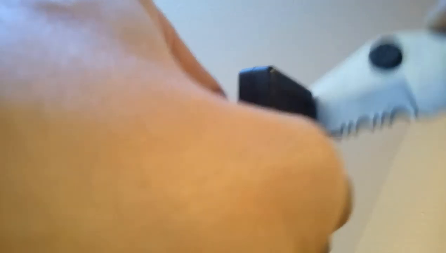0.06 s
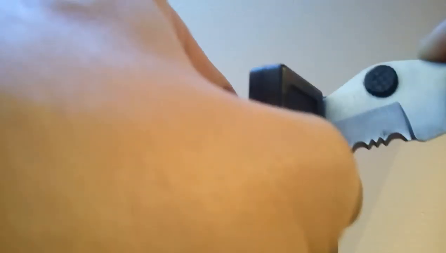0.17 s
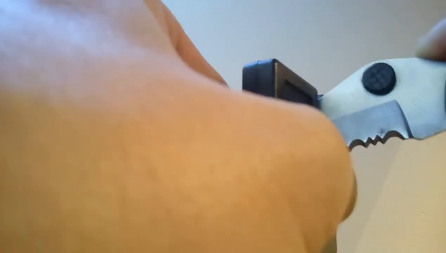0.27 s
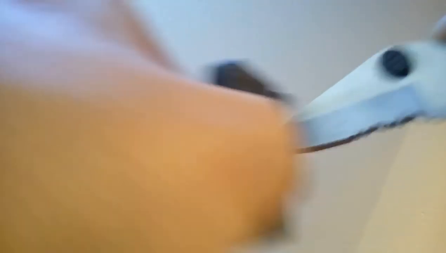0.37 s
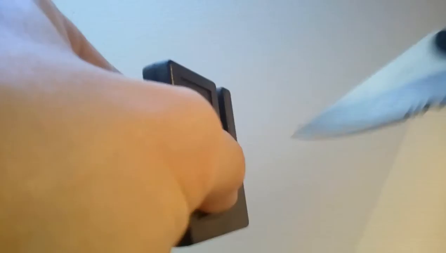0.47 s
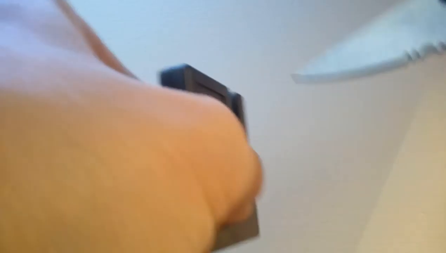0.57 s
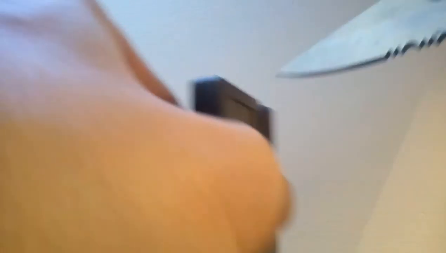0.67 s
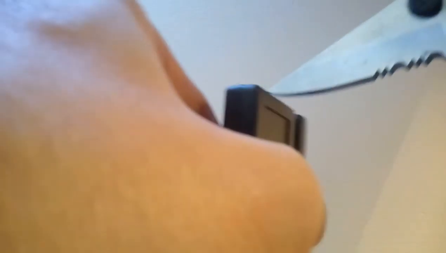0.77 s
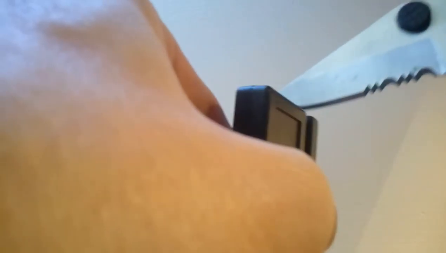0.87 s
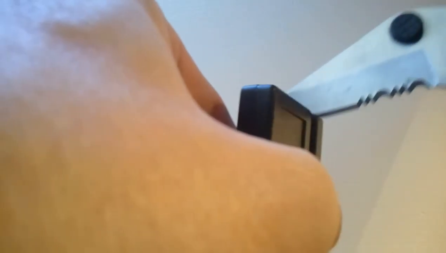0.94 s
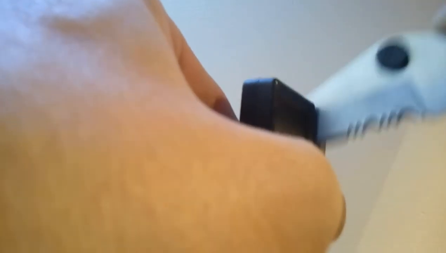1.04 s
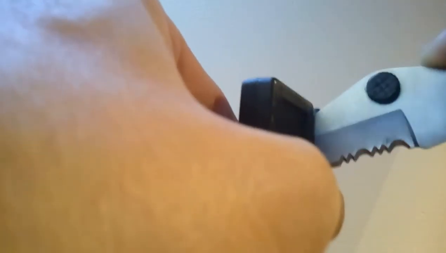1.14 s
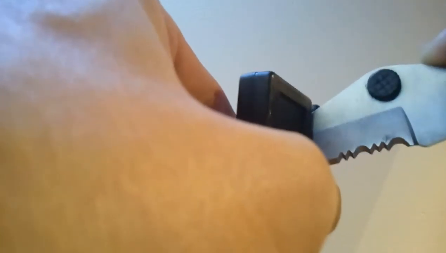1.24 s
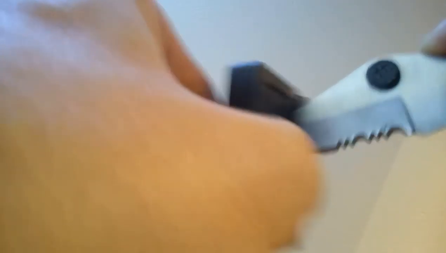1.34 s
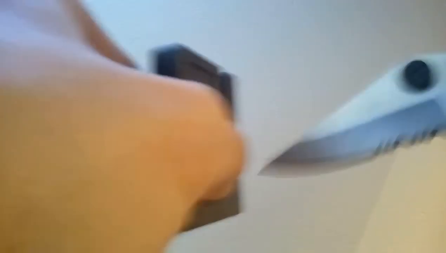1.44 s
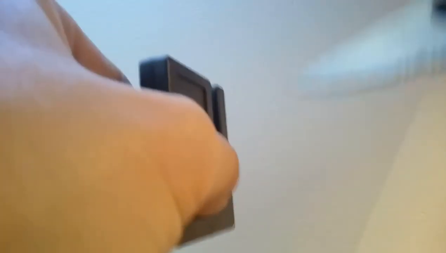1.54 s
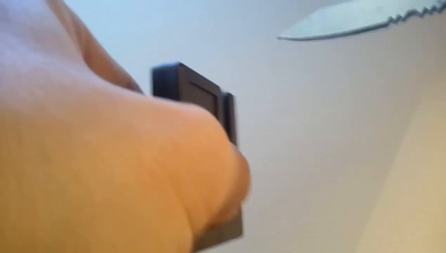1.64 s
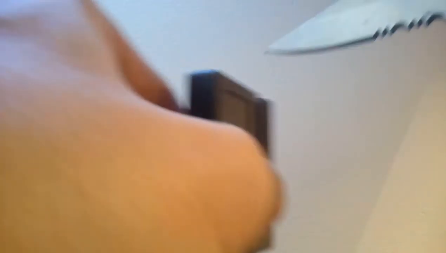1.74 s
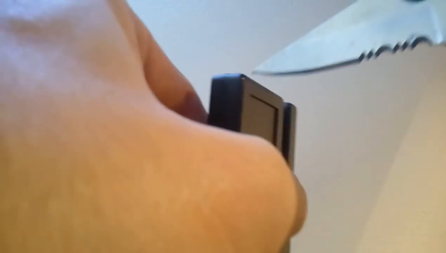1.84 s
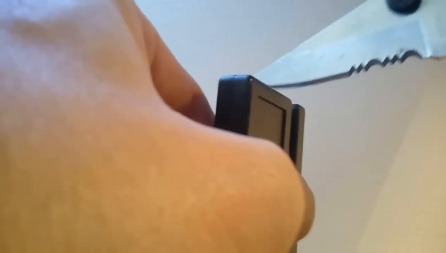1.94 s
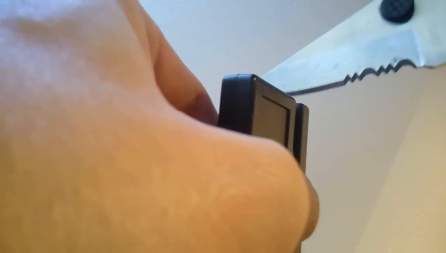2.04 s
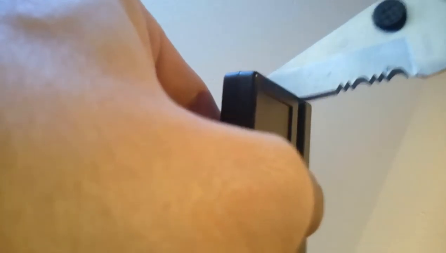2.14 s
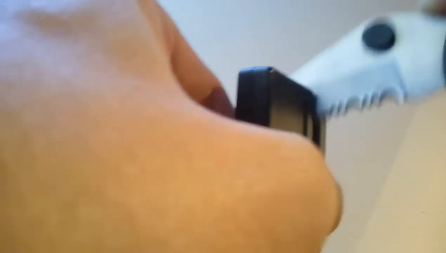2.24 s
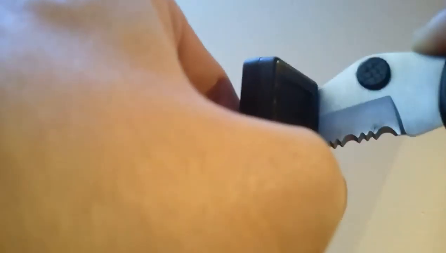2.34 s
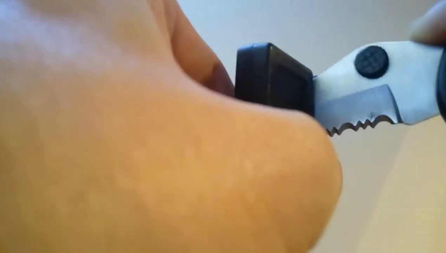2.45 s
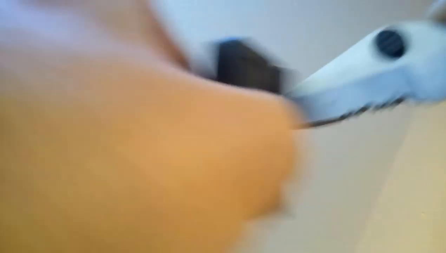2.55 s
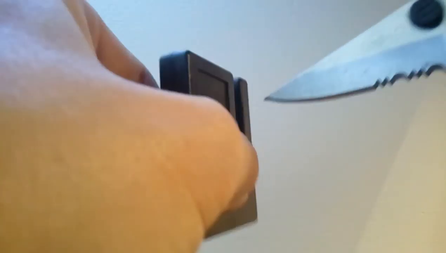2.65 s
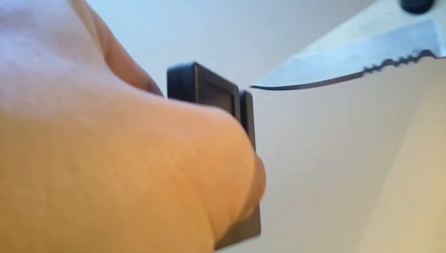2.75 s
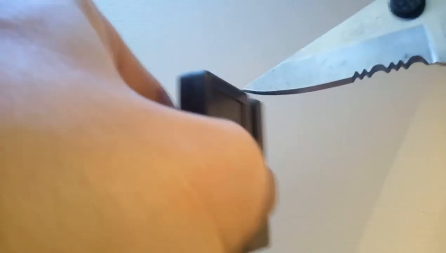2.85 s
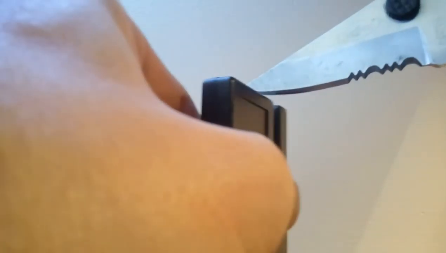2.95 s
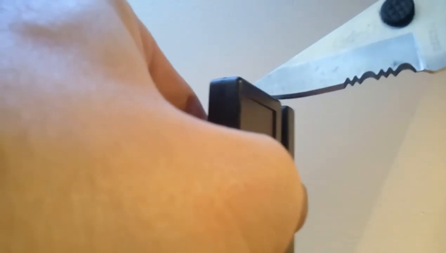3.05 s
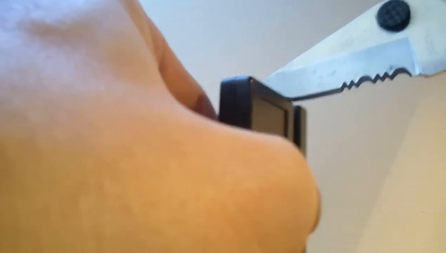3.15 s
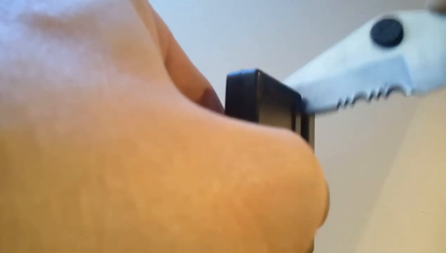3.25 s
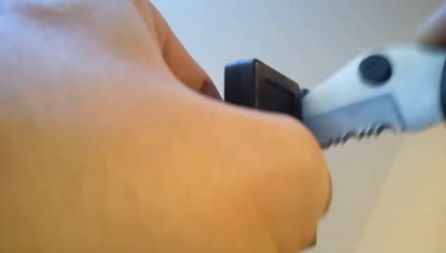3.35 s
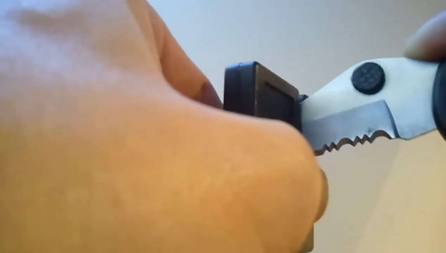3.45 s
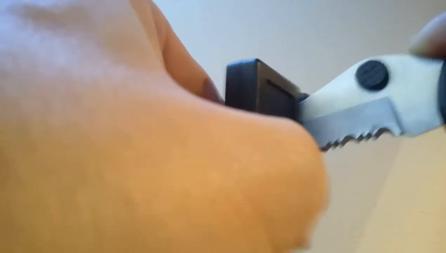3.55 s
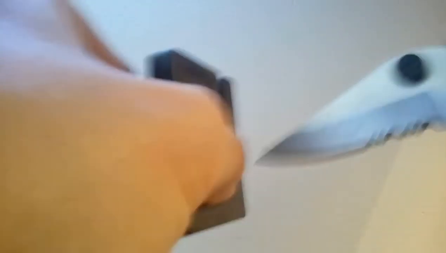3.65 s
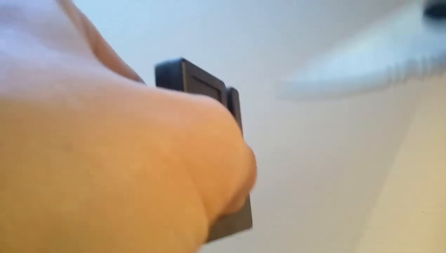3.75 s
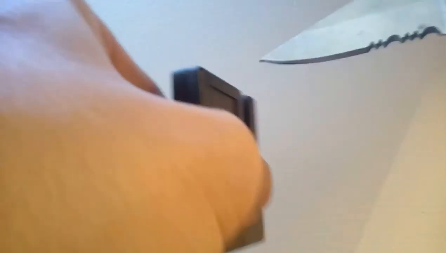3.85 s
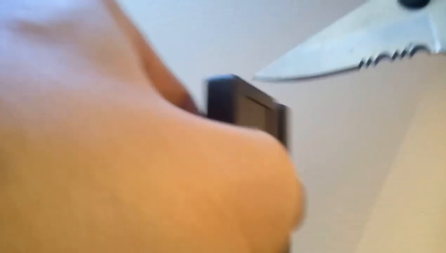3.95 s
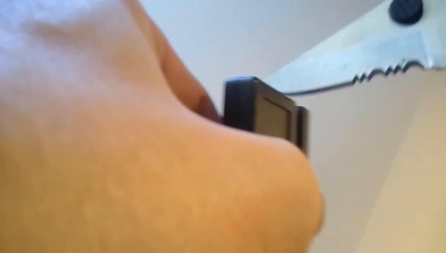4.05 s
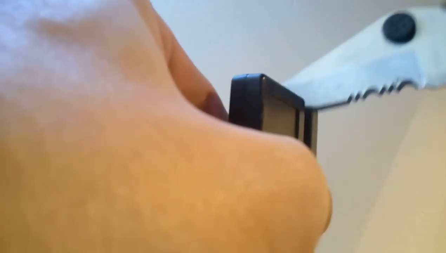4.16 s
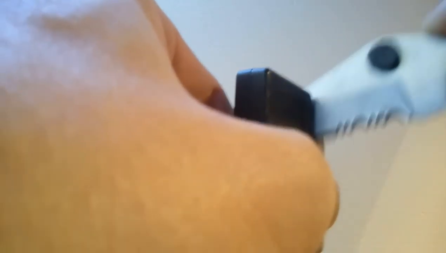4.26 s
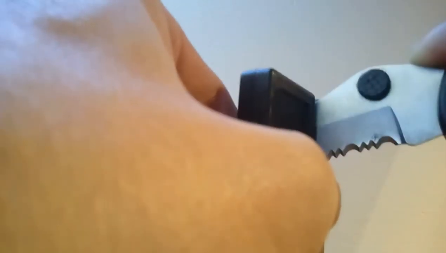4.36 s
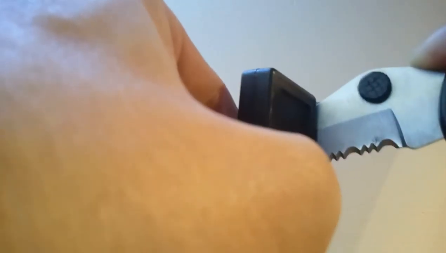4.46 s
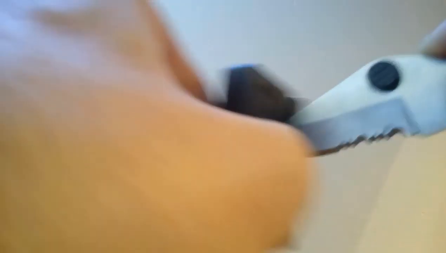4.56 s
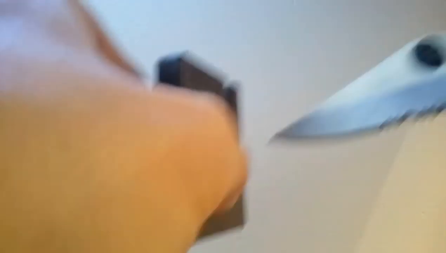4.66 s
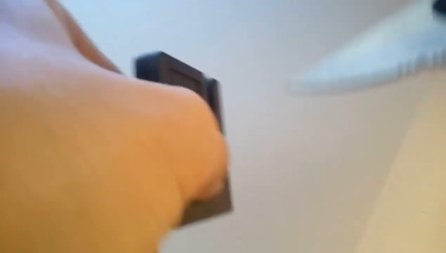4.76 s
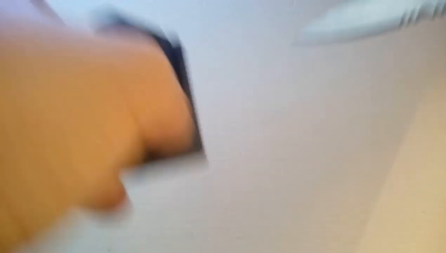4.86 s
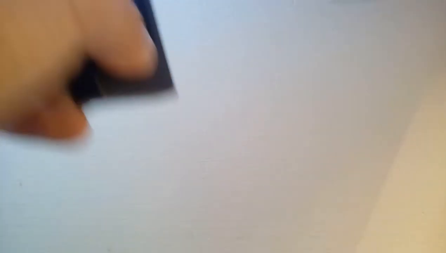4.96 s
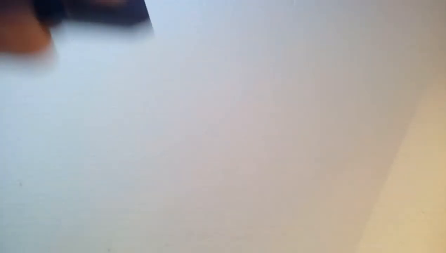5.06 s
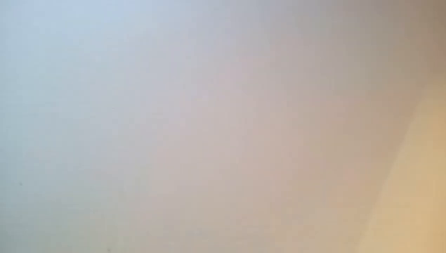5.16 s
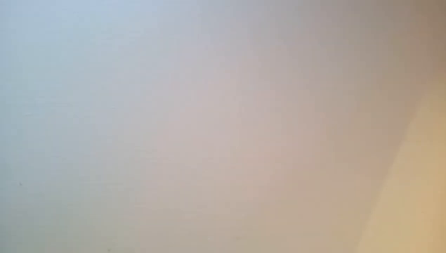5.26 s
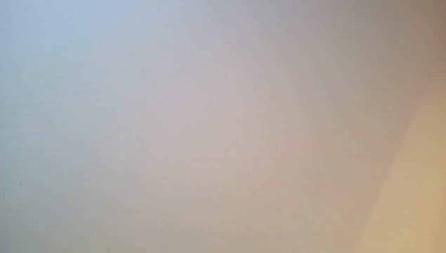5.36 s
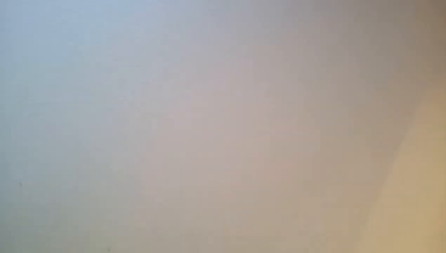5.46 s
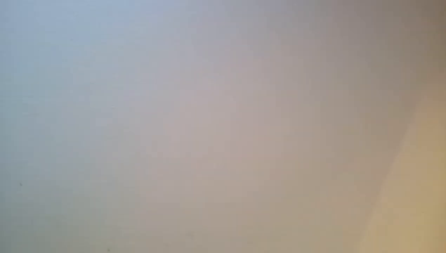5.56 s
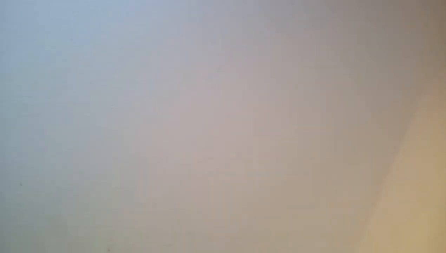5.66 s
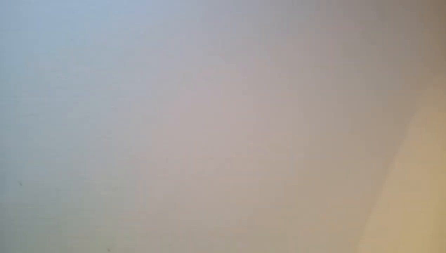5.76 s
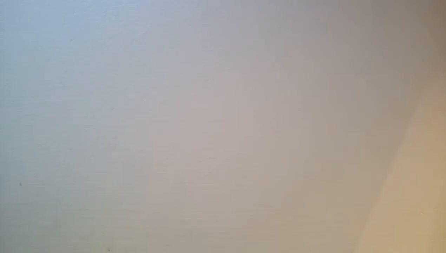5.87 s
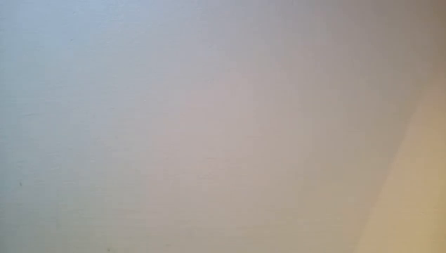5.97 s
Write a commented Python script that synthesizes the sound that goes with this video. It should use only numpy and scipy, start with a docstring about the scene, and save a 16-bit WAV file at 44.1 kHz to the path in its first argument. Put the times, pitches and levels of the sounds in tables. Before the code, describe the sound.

A knife blade clicks into a small plastic sharpener and rasps through in five short strokes, then light ticks and a knock as it is set down.

```python
"""A folding knife is drawn five times through a small plastic pull-through sharpener, close to a camera in a quiet room.
Each pull: the blade clicks into the slot, grit-driven noise hisses and rasps over the ceramic, a fuller click ends it,
faint at some, and the hand jolts (low damped modes). Skin rubs the camera case (slips through resonances), twice with
a faint high line. The blade skates in once; later the knife ticks, a sleeve rustles, and the sharpener is set down.
Room air and grip rumble lie beneath; room reflections and the microphone port colour the sound."""
import sys
import numpy as np
from scipy import signal
from scipy.fft import rfft, irfft, next_fast_len
from scipy.io import wavfile
from scipy.ndimage import map_coordinates

SR = 44100
rng = np.random.default_rng(int(sys.argv[2]) if len(sys.argv) > 2 else 0)


def put_to_file(sound):
    """Save the sound as 16-bit audio at rate SR, in the file named by the first command-line argument."""
    columns = np.atleast_2d(sound).T  # one column per channel
    safe = np.clip(columns, -1, 1)
    whole_steps = np.round(safe * 32767)
    wavfile.write(sys.argv[1], SR, whole_steps.astype(np.int16))


N = 265482  # length in samples

# Room air around the microphone. Each row: frequency in Hz, relative density in dB.
ROOM_AIR_SPECTRUM = [(15, -50.5), (25, -19), (114, -8.5), (242, -14.5), (427, -16.5), (734, -20),
                     (962, -18.5), (1230, -25.5), (5570, -33), (16000, -51.5)]
# Low rumble and thump of the gripping hand. Each row: frequency in Hz, relative density in dB.
GRIP_SPECTRUM = [(30, -27.5), (60, -12), (115, 5.5), (170, -5.5), (240, -9), (900, -56.5)]
# The grip tightens and its rumble swells. Each row: middle in seconds, level in dB.
GRIP_SWELLS = [(0.17, -50.5), (0.87, -51), (1.88, -50), (2.34, -50), (3.19, -56.5), (4.2, -49.5),
               (4.49, -46), (5.3, -58.5), (5.789, -50)]
GRIP_DB, GRIP_SWELL_S = -55, 0.046  # steady rumble; time from a swell's middle until it falls to 1/e

# The blade touches the lip of the slot, then seats in it. Each row: touch in seconds, seating in seconds,
# level in dB, lower housing ring in dB and steel ring in dB (both relative to the level; seating only).
SEATINGS = [(0.22, 0.2241, -4.5, -17, -7.5), (1.194, 1.204, -7, -3.5, -10.5), (2.419, 2.433, -4, -24, -11),
            (3.4833, 3.493, -4.5, -3.5, -15), (4.432, 4.436, -5.5, -16.5, -14.5)]
TOUCH_DB = -9.5  # the first touch, against the seating
# Plastic housing, lower mode first. Each row: frequency in Hz, relative level in dB, 60 dB decay in seconds.
HOUSING_MODES = [(2490, 0, 0.0096), (3380, -3, 0.0043)]
# Steel blade. Each row: frequency in Hz, relative level in dB, 60 dB decay in seconds.
STEEL_MODES = [(4000, -12.5, 0.004), (4505, 1, 0.0043), (4830, 4.5, 0.0053), (5470, -1.5, 0.004),
               (6340, -11, 0.005)]
# Noise of a hard steel contact. Each row: frequency in Hz, relative density in dB.
CRACK_SPECTRUM = [(60, -9.5), (300, -1.5), (1050, 10.5), (1650, 17.5), (2000, -2), (2500, 9), (6500, 13.5),
                  (8000, -9), (15000, -23)]
# Its topmost glint. Each row: frequency in Hz, relative density in dB.
SPARK_SPECTRUM = [(5000, -39.5), (7500, -3.5), (9800, 3.5), (11000, -6.5), (15000, -3)]
# Loose parts after a contact. Each row: frequency in Hz, relative density in dB.
RATTLE_SPECTRUM = [(300, -1), (2000, -6), (3500, -2), (6300, -4.5), (7800, -18.5), (15000, -33)]
CHATTER_DB = -5  # the chatter that goes with a contact, against its sharp push

# Room decay. Each row: frequency in Hz, 60 dB decay in seconds.
ROOM_DECAY = [(150, 0.25), (1000, 0.23), (4500, 0.11), (8000, 0.07), (15000, 0.065)]

# The blade is drawn through the slot. Each row: start in seconds, end in seconds,
# steel hiss in dB, housing rasp in dB, closing click in dB.
PULLS = [(0.415, 0.526, -32, -23.5, -1.5), (1.431, 1.531, -25.5, -26, 6.5),
         (2.612, 2.743, -31.5, -27.5, -16), (3.693, 3.777, -31.5, -22.5, -3),
         (4.64, 4.752, -23, -25.5, -14.5)]
# Grit against the steel edge. Each row: frequency in Hz, relative density in dB.
HISS_SPECTRUM = [(200, -37.5), (1100, -24.5), (2000, -30.5), (2950, -25.5), (3700, -1), (4800, 6.5),
                 (5500, 1.5), (6400, -16), (7500, -34.5), (9000, -48), (15000, -53.5)]
# Grit heard through the housing. Each row: frequency in Hz, relative density in dB.
RASP_SPECTRUM = [(100, -10.5), (350, -2), (700, -12.5), (1100, 0.5), (2100, -8), (2550, 0), (2900, -6.5),
                 (3400, 4.5), (4100, -7.5), (6500, -13), (7700, -23), (9000, -36), (15000, -42.5)]

# The hand recoils as the blade comes free. Each row: start in seconds, level in dB (lowered by JOLT_TRIM_DB).
JOLTS = [(0.527, -20.5), (1.535, -16.5), (2.783, -30.5), (3.777, -19.5), (4.828, -28.5)]
JOLT_TRIM_DB = -4.5

# Skin slides on the camera. Each row: start in seconds, length in seconds, rub level in dB, low drone level in dB.
RUBS = [(0.538, 0.1, -33.5, -40), (1.559, 0.085, -36, -47.5), (1.794, 0.029, -41, -52),
        (2.753, 0.13, -45.5, -54), (3.599, .02, -37.5, -55.5), (3.811, 0.1, -34, -46.5),
        (4.843, 0.04, -41.5, -46), (5.008, 0.064, -24.5, -32)]
RUB_SAG_DB_PER_S, DRONE_SAG_DB_PER_S, DRONE_HOLD_S = 71, 23.5, 0.016  # a touch eases off; the drone holds longer
# Camera case. Each row: frequency in Hz, width in Hz, relative level in dB.
CASE_MODES = [(683, 110, 0), (998, 41, 4.5), (1130, 86, -7), (1480, 85, -7), (1760, 140, -13)]
# Deep resonances of the case. Each row: frequency in Hz, width in Hz, relative level in dB.
CASE_LOW_MODES = [(222, 30, 2), (316, 19, -2.5), (418, 55, -10)]
# Skin friction. Each row: frequency in Hz, relative density in dB.
SKIN_SPECTRUM = [(150, -34.5), (400, -10), (1000, -4.5), (1600, -11), (2000, -17.5), (4200, -17),
                 (5500, -30), (6800, -16)]
# A faint fuzzy high line near 7 kHz, twice, during rubs. Each row: middle in seconds, level in dB,
# time to fall to 1/e in seconds.
HIGH_LINES = [(3.6, -44, 0.029), (5.053, -41, 0.055)]

# The loose tip bumps the sharpener. Each row: start in seconds, level in dB.
BUMPS = [(0.574, -20.5), (2.959, -15.5), (4.458, -19.5)]

# Light handling of the knife. Each row: start in seconds, level in dB, pitch in Hz.
TICKS = [(4.272, -34.5, 2420), (5.349, -47, 3300), (5.3608, -41.5, 4270), (5.396, -62, 3750),
         (5.414, -38.5, 3800), (5.427, -38.5, 4510), (5.703, -36.5, 3005), (5.837, -34, 1425),
         (5.8562, -35, 1710)]
# A light hard contact. Each row: frequency in Hz, relative density in dB.
TAP_SPECTRUM = [(600, -5.5), (1500, -12.5), (3000, 7), (6000, -9), (8500, -54), (15000, -50)]

# The edge skates into the slot. Each row: time in seconds, relative level in dB, pitch in Hz.
SKATE = [(4.315, -59, 2550), (4.345, -56, 2750), (4.362, -52, 3050), (4.415, -57, 2900)]

# The arm moves away. Each row: time in seconds, level in dB (lowered by SLEEVE_TRIM_DB).
RUSTLE = [(5.13, -61.5), (5.43, -57), (5.54, -66.5)]
SLEEVE_TRIM_DB = -1.5
# Moving cloth. Each row: frequency in Hz, relative density in dB.
SLEEVE_SPECTRUM = [(1500, -41), (3000, -4.5), (4000, 3.5), (5800, -5), (9000, -44)]

# The sharpener set down. Each row: frequency in Hz, mean level in dB, 60 dB decay in seconds.
KNOCK_MODES = [(323, -32, 0.33), (966, -15, 0.18), (1047, -26, 0.34), (1303, -19.5, 0.087),
               (1390, -17, 0.015), (3300, -32.5, 0.2), (4850, -20.5, 0.047)]

# Colour of the microphone port. Each row: frequency in Hz, gain in dB.
PORT_COLOUR = [(1550, -0.5), (2000, -1), (2450, -1.5), (2900, -1.5), (3350, 0), (4000, 1.5), (6500, -0.5),
               (8200, -6), (10000, -6)]
TOP_HZ = 15700  # band limit of the camera


def amp(db):
    """Decibels to gain."""
    return 10 ** (np.asarray(db) / 20)


def unit(x):
    """Scale to rms 1."""
    return x / np.sqrt(np.mean(x ** 2) + 1e-20)


def blow(x):
    """Scale a short sound to the energy of one millisecond at level 1."""
    return x / np.sqrt(np.sum(x ** 2) / (SR / 1000) + 1e-20)


def add(track, s, sound):
    """Mix a sound in at s seconds, cut off where the track ends."""
    part = track[round(s * SR):][:len(sound)]
    part += sound[:len(part)]


def along(points, hz):
    """(Hz, value) points read on a log frequency axis."""
    f, v = np.transpose(points)
    return np.interp(np.log(hz + 1), np.log(f + 1), v)


def filtered(x, response):
    """x times a response of frequency."""
    m = next_fast_len(len(x) + 8192)
    return irfft(rfft(x, m) * response(np.fft.rfftfreq(m, 1 / SR)), m)[:len(x)]


def low_pass(x, hz, order):
    """x with everything above hz rolled off."""
    return filtered(x, lambda f: 1 / (1 + (f / hz) ** order))


def coloured(x, spectrum):
    """x shaped by a (Hz, dB) spectrum, at rms 1."""
    return unit(filtered(x, lambda hz: amp(along(spectrum, hz))))


def resonant(x, modes):
    """x through resonances of alternating sign, at rms 1."""
    def response(f):
        total = 0
        for k, (centre, width, db) in enumerate(modes):
            damping = 1j * f * width
            total = total + (-1) ** k * amp(db) * damping / (centre * centre - f * f + damping)
        return total
    return unit(filtered(x, response))


def narrow(hz, width_hz):
    """A fuzzy line: noise of rms 1 around a pitch that may move."""
    drift = filtered(rng.standard_normal(N), lambda f: 1 / (1 + (f / width_hz) ** 4))
    phase = 2 * np.pi * np.cumsum(hz * np.ones(N)) / SR
    return unit(drift * np.sin(phase))


def wobble(rate):
    """A smooth random curve, rate knots a second."""
    knots = rng.standard_normal(int(N * rate / SR) + 4)
    return map_coordinates(knots, [np.arange(N) * rate / SR])


def grit(rate, spread_db):
    """Tiny slips of uneven size at random moments, rate a second, at rms 1."""
    slips = rng.random(N) < rate / SR
    size = rng.standard_normal(N) * amp(spread_db * rng.standard_normal(N))
    return unit(slips * size)


def burst(spectrum, t, t60):
    """A puff of coloured noise that dies away."""
    return coloured(rng.standard_normal(len(t)), spectrum) * amp(-60 * t / t60)


def ring(modes, t):
    """Damped modes, levels a little different and phases random each time."""
    total = 0
    for hz, db, t60 in modes:
        level = amp(db + 2 * rng.standard_normal() - 60 * t / t60)
        total = total + level * np.sin(2 * np.pi * (hz * t + rng.random()))
    return total


def struck(modes, contact, t):
    """Modes rung by one sharp push and the brief chatter of the contact."""
    push = blow(np.arange(len(t)) == round(.0008 * SR))
    force = push + amp(CHATTER_DB) * blow(contact * rng.standard_normal(len(t)))
    ringing = ring(modes, t) * (1 - np.exp(-t / .0004))
    return blow(signal.fftconvolve(force, ringing)[:len(t)])


def gestures(rows, fade):
    """Gain that follows (seconds, dB) points and dies away outside them."""
    t, rows = np.arange(N) / SR, np.array(rows)
    outside = np.abs(t - np.clip(t, rows[0, 0], rows[-1, 0]))
    return amp(np.interp(t, rows[:, 0], rows[:, 1])) * np.exp(-outside / fade)


def held(s, length, attack, sag_db, release):
    """Gain that swells to 1 at s, sags by sag_db a second while held, then dies away."""
    t = np.arange(N) / SR - s
    before, after = np.minimum(t, 0), np.maximum(t - length, 0)
    return amp(-sag_db * np.clip(t, 0, length)) * np.exp(-(before / attack) ** 2 - after / release)


def arch(start, end, crest, rise_db, ease_db):
    """Gain of one pull: a rounded swell to its crest (a share of the pull), an easing off, a quick stop."""
    u = np.clip((np.arange(N) / SR - start) / (end - start), 0, 1)
    rise = rise_db * (1 - u / crest) ** 2
    ease = ease_db * ((u - crest) / (1 - crest)) ** 2
    drop = np.where(u < crest, rise, ease)
    return amp(-drop) * held(start, end - start, attack=0.0015, sag_db=-1.5, release=0.0086)


def click(lower_db, upper_db, steel_db, spark_db):
    """Steel chatters on ceramic: a crack, a brief ring of blade and housing, a loose rattle and a dull push."""
    t = np.arange(SR // 6) / SR
    contact = (1 - np.exp(-t / 0.00053)) * np.exp(-(t / 0.0022) ** 2)

    def cracked(spectrum):
        return blow(contact * coloured(rng.standard_normal(len(t)), spectrum))

    # where the blade lands decides which mode of the housing speaks
    lower = amp(lower_db) * struck(HOUSING_MODES[:1], contact, t)
    upper = amp(upper_db) * struck(HOUSING_MODES[1:], contact, t)
    steel = amp(steel_db) * struck(STEEL_MODES, contact, t)
    body = amp(3.0) * (lower + upper + steel)
    crack = amp(-9.5) * cracked(CRACK_SPECTRUM) + amp(spark_db) * cracked(SPARK_SPECTRUM)
    rattle = amp(-21) * blow(burst(RATTLE_SPECTRUM, t, t60=0.15))
    push = amp(-23) * blow(burst(GRIP_SPECTRUM, t, t60=0.26))
    return body + crack + rattle + push


def background():
    """Steady room air, and the gripping hand as low noise that wavers and swells."""
    t = np.arange(N) / SR
    grip = amp(GRIP_DB + 1.1 * wobble(3.4))
    for s, db in GRIP_SWELLS:
        grip += amp(db) * np.exp(-((t - s) / GRIP_SWELL_S) ** 2)
    rumble = grip * coloured(rng.standard_normal(N), GRIP_SPECTRUM)
    return rumble + amp(-57.5) * coloured(rng.standard_normal(N), ROOM_AIR_SPECTRUM)


def seatings():
    """A bright double click as the blade goes in: a lighter touch on the lip, then the seating."""
    out = np.zeros(N)
    for touch, seated, db, housing_db, steel_db in SEATINGS:
        first = click(lower_db=-20, upper_db=-13, steel_db=-6.5, spark_db=-15)
        second = click(lower_db=housing_db, upper_db=-20.5, steel_db=steel_db, spark_db=-14)
        add(out, touch, amp(db + TOUCH_DB) * first)
        add(out, seated, amp(db) * second)
    return out


def room(x):
    """Nearby surfaces and walls answer with diffuse noise, drawn afresh for each stretch; the treble dies first."""
    out, t = np.zeros(N), np.arange(SR // 2) / SR
    for part in np.array_split(np.arange(N), 15):
        hz, frames, z = signal.stft(rng.standard_normal(len(t)), SR, nperseg=256)
        decay = amp(-60 * frames / along(ROOM_DECAY, hz)[:, None])
        tail = signal.istft(z * decay, SR, nperseg=256)[1][:len(t)]
        early = rng.standard_normal(len(t)) * amp(-60 * t / 0.018)
        answer = amp(-12.0) * early / np.linalg.norm(early) + amp(-18.5) * tail / np.linalg.norm(tail)
        answer = answer * (t > .003)  # silent until the first reflection
        add(out, part[0] / SR, signal.fftconvolve(x[part], answer))
    return out


def scrape():
    """Ceramic grit bites the edge: steel hiss and housing rasp swell together, and the rasp holds on better."""
    t = np.arange(SR // 40) / SR

    def sung(slips, modes):
        return unit(low_pass(signal.fftconvolve(slips, ring(modes, t))[:N], hz=6270, order=10))

    # the edge judders finely while the hand's pressure varies more slowly
    judder = unit(amp(2.1 * wobble(300) + 1.1 * wobble(80)))
    hiss = amp(-1.5) * coloured(grit(rate=10000, spread_db=5.0), HISS_SPECTRUM)
    hiss += amp(-5.5) * sung(grit(rate=3900, spread_db=0.5), STEEL_MODES)
    rasp = amp(-2.0) * coloured(grit(rate=8600, spread_db=1.5), RASP_SPECTRUM)
    rasp += amp(-6.5) * sung(grit(rate=4000, spread_db=6.5), HOUSING_MODES)
    hissing, rasping = np.zeros(N), np.zeros(N)
    for start, end, hiss_db, rasp_db, _ in PULLS:
        hissing += amp(hiss_db) * arch(start, end, crest=0.65, rise_db=24, ease_db=11)
        rasping += amp(rasp_db) * arch(start, end, crest=0.64, rise_db=35.5, ease_db=3.5)
    return judder * (hissing * hiss + rasping * rasp)


def closing_clicks():
    """A fuller click at the end of the pulls, faint at some."""
    out = np.zeros(N)
    for _, end, _, _, db in PULLS:
        add(out, end, amp(db) * click(lower_db=-14, upper_db=-10, steel_db=-15.5, spark_db=-37))
    return out


def jolts():
    """The freed hand shudders in damped low modes and thumps softly."""
    out, t = np.zeros(N), np.arange(SR // 2) / SR
    for s, db in JOLTS:
        shudder = ring([(62.0, -3.5, 0.33), (84, -7.5, 0.21), (165.4, -13.5, 0.33)], t)
        thump = amp(-7) * burst(GRIP_SPECTRUM, t, t60=0.17)
        onset = 1 - np.exp(-t / 0.0024)
        add(out, s, amp(db + JOLT_TRIM_DB) * onset * (shudder + thump))
    return out


def rubs():
    """Skin sticks and slips on the camera case, which answers with its resonances."""
    lumps = unit(amp(1.8 * wobble(80) + 1.2 * wobble(30)))
    rub = amp(-4.0) * resonant(grit(rate=2700, spread_db=1.5), CASE_MODES)
    rub += amp(-9.5) * coloured(grit(rate=1000, spread_db=3), SKIN_SPECTRUM)
    drone = resonant(rng.standard_normal(N), CASE_LOW_MODES)
    rubbing, droning = np.zeros(N), np.zeros(N)
    for s, length, rub_db, drone_db in RUBS:
        rubbing += amp(rub_db) * held(s, length, attack=0.032, sag_db=RUB_SAG_DB_PER_S, release=0.021)
        droning += amp(drone_db) * held(s, length + DRONE_HOLD_S, attack=0.042,
                                        sag_db=DRONE_SAG_DB_PER_S, release=0.038)
    return low_pass(lumps * rubbing * rub + droning * drone, hz=5380, order=8)


def bumps():
    """The loose tip bumps the sharpener: dulled clicks."""
    out = np.zeros(N)
    for s, db in BUMPS:
        bump = click(lower_db=-34, upper_db=-16, steel_db=-21.5, spark_db=-47)
        add(out, s, amp(db) * low_pass(bump, hz=7100, order=6))
    return out


def high_lines():
    """A faint fuzzy high line near 7 kHz, twice, during rubs: narrow noise under a rounded swell."""
    t = np.arange(N) / SR
    swell = sum(amp(db) * np.exp(-((t - s) / length) ** 2) for s, db, length in HIGH_LINES)
    return swell * narrow(7110, width_hz=81)


def ticks():
    """Small parts of the knife tap and rattle: one struck mode with a short and a long puff of noise."""
    out, t = np.zeros(N), np.arange(SR // 8) / SR
    contact = np.exp(-t / 0.011)
    for s, db, hz in TICKS:
        tap = amp(1) * struck([(hz, 0, .014)], contact, t)
        tap += amp(-6.5) * blow(burst(TAP_SPECTRUM, t, t60=0.041))
        tap += amp(-8.5) * blow(burst(TAP_SPECTRUM, t, t60=0.4))
        add(out, s, amp(db) * tap)
    return low_pass(out, hz=7700, order=8)


def skate():
    """The edge sings faintly and unevenly as it skates in: a fuzzy line of moving pitch."""
    s, _, hz = np.transpose(SKATE)
    pitch = np.interp(np.arange(N) / SR, s, hz)
    return gestures(SKATE, fade=0.004) * amp(2.5 * wobble(90)) * narrow(pitch, width_hz=260)


def sleeve():
    """A sleeve rustles away: tiny slips coloured by cloth."""
    cloth = coloured(grit(rate=5300, spread_db=0.0), SLEEVE_SPECTRUM)
    return amp(SLEEVE_TRIM_DB) * gestures(RUSTLE, fade=0.046) * cloth


def knock():
    """The sharpener lands on a hard top, which rings in damped modes under a short clatter."""
    out, t = np.zeros(N), np.arange(SR // 4) / SR
    clatter = amp(-22.5) * burst(TAP_SPECTRUM, t, t60=0.099) + amp(-17.5) * burst(SKIN_SPECTRUM, t, t60=0.14)
    add(out, 5.9597, ring(KNOCK_MODES, t) + clatter)
    return low_pass(out, hz=5930, order=6)


def scene():
    """Knife and sharpener answered by the room; handling and background reach the microphone without it."""
    direct = seatings() + scrape() + closing_clicks() + bumps() + ticks() + skate() + sleeve() + knock()
    return (background() + direct + room(direct) + jolts() + rubs() + high_lines())[None]


def record(dry):
    """The microphone port colours the sound; the camera clips at full scale and rolls off above its band limit."""
    heard = filtered(dry[0], lambda hz: amp(along(PORT_COLOUR, hz)))
    return low_pass(np.clip(heard, -1, 1), hz=TOP_HZ, order=80)[None]


dry = scene()
out = record(dry)
put_to_file(out)
```